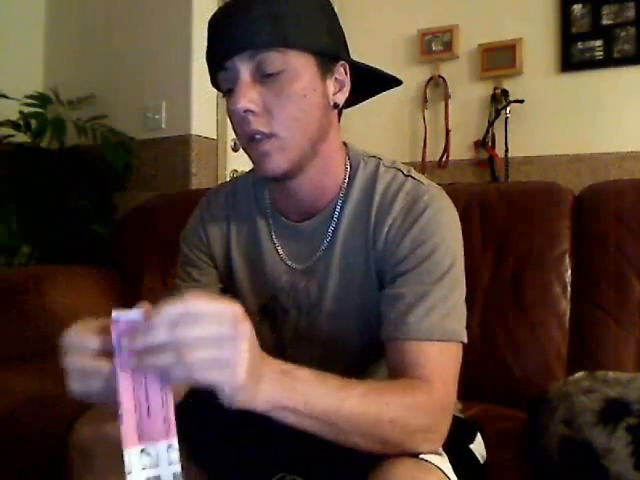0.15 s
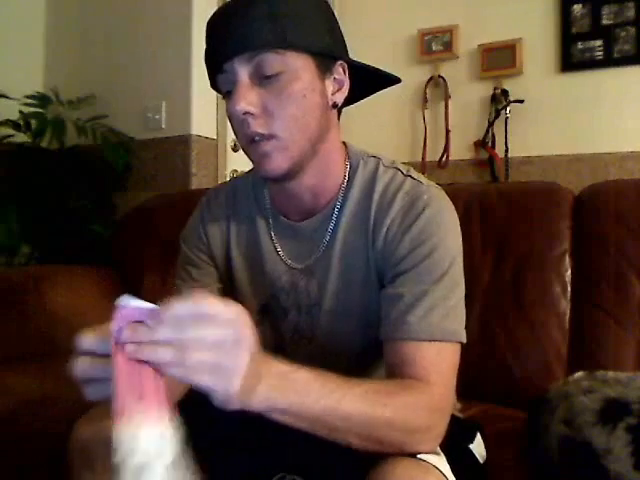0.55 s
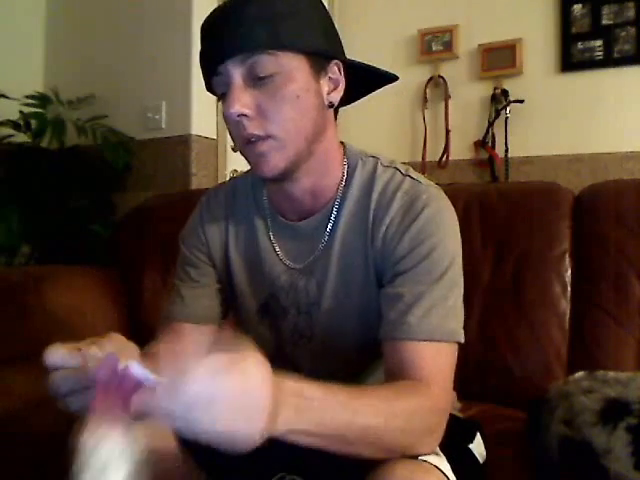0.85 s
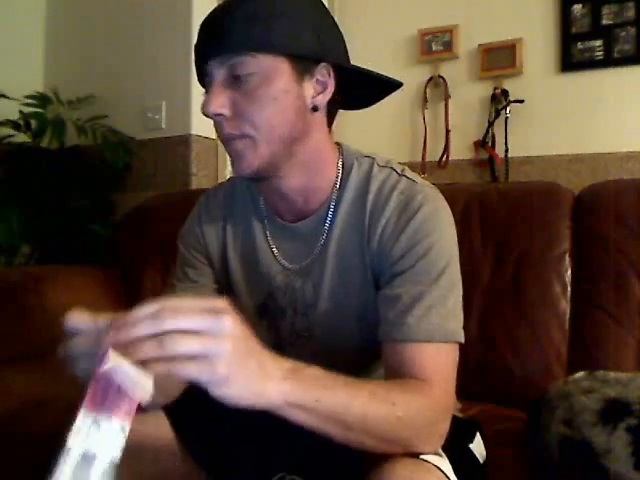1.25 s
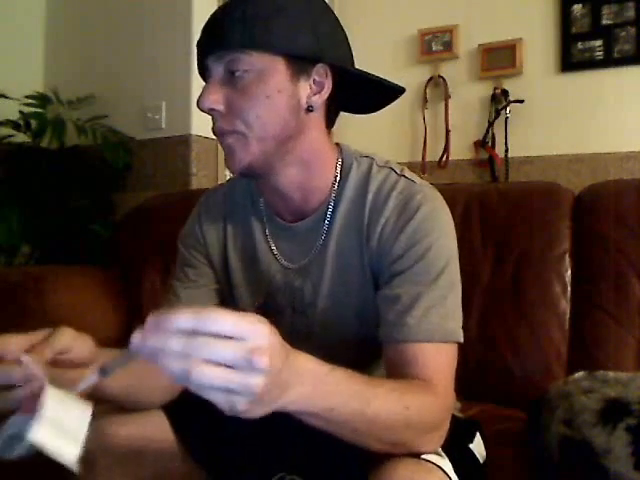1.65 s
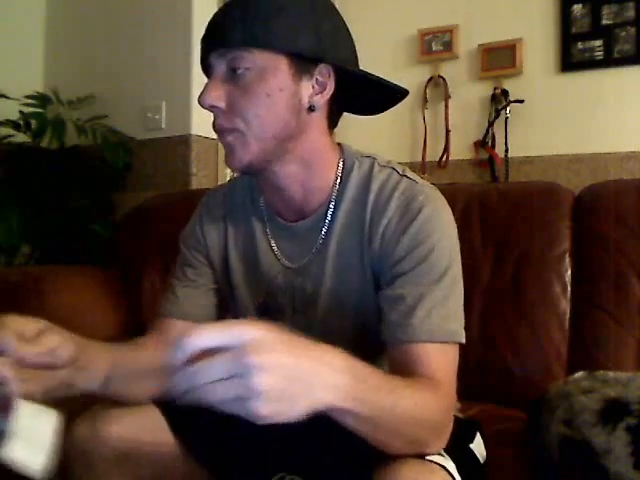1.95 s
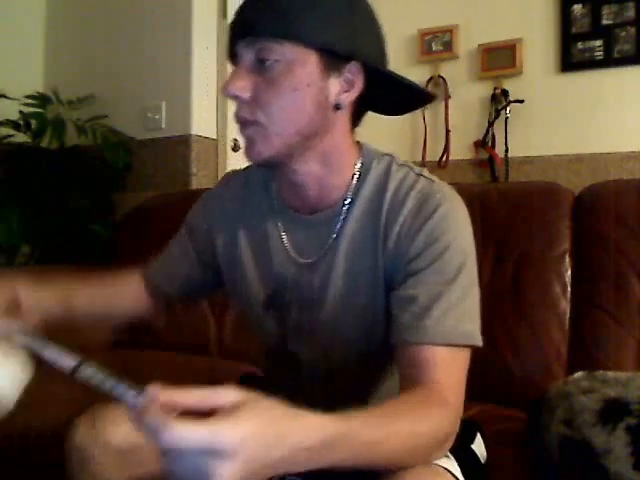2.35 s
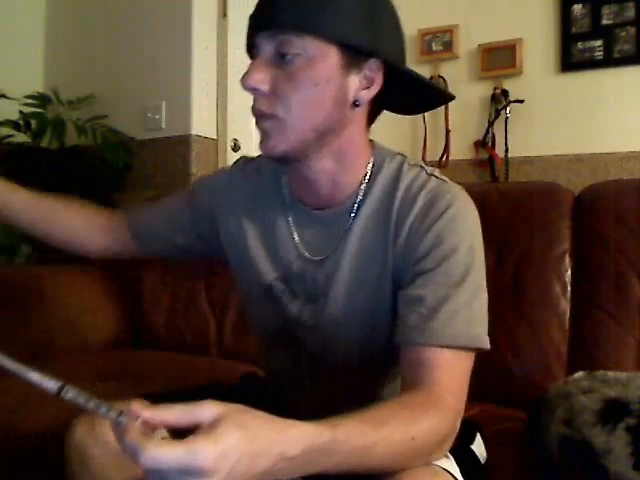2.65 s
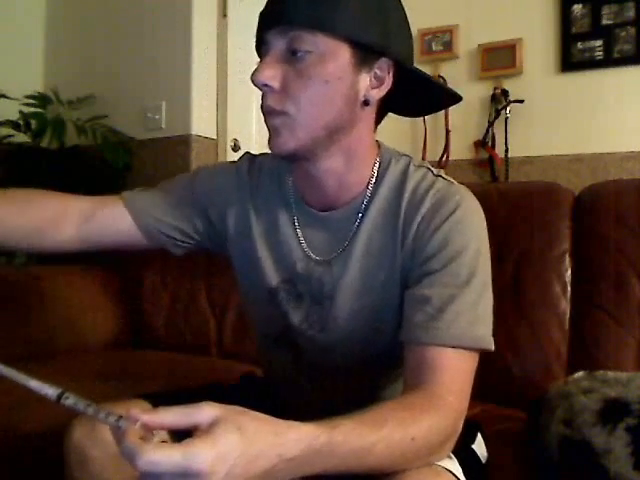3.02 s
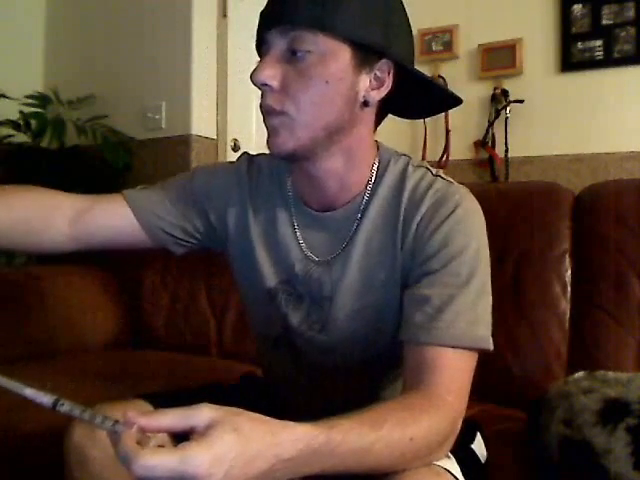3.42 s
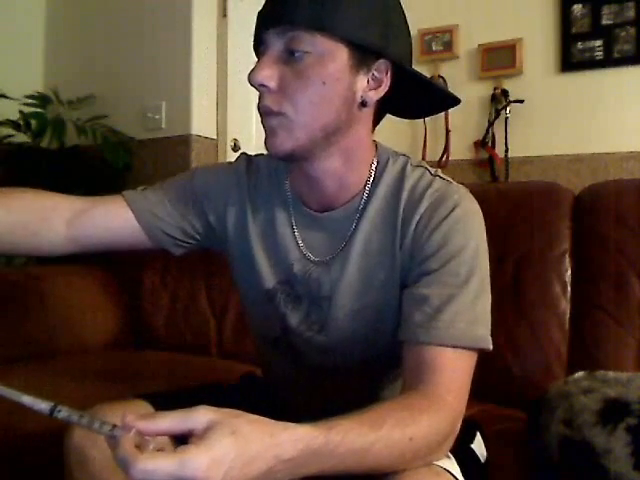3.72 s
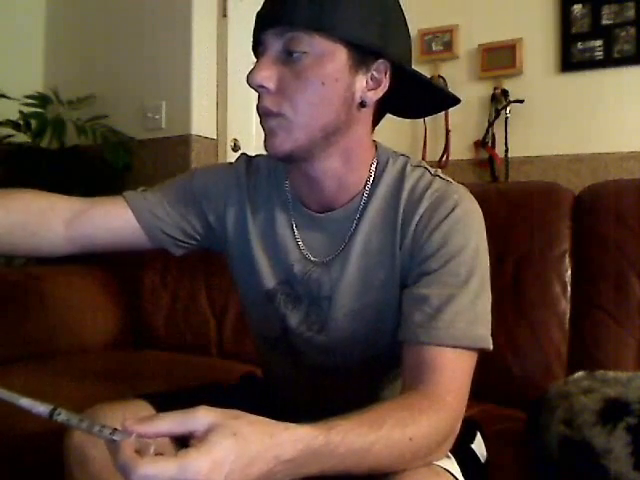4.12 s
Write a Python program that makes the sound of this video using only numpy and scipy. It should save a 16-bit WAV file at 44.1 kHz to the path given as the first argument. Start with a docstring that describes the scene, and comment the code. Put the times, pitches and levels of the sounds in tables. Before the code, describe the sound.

Hands open a small sealed packet indoors: scattered crisp snaps first, a hard tearing burst peaking around 0.6 seconds, brief crackling pulls until about 1.6, and two short clusters of snaps near 1.9 and 2.2. After that only weak plastic ticks and soft rubbing remain over muffled steady background noise. Dry, close, limited treble, with a short small-room reflection.

```python
"""A paper and plastic peel pack is pulled open in a living room, close to a small desk microphone.
First the film buckles in sharp snaps: broad noise cracks, each with the ring of a panel.
Then the seal tears in dense crackle of random grains, the sheet flexes and the syringe slides out with a hiss.
Last, fingers tick and rub faintly on the barrel. Quiet room noise, coloured and steady, lies under it all."""
import sys
import numpy as np
from scipy import signal
from scipy.fft import rfft, irfft
from scipy.io import wavfile
from scipy.ndimage import uniform_filter1d

SR = 44100
rng = np.random.default_rng(int(sys.argv[2]) if len(sys.argv) > 2 else 0)


def store_wav(level_fs):
    """Save 16-bit WAV to argv[1]."""
    pcm = np.round(np.clip(np.atleast_2d(level_fs), -1, 1) * 32767)
    wavfile.write(sys.argv[1], SR, pcm.T.astype(np.int16))


N = 188375
T = np.arange(N) / SR  # seconds

# Source levels below are set ahead of the room and the microphone.
# Steady background of the room. Each row: frequency [Hz], relative level [dB].
ROOM_COLOUR = [(15, -62), (25, -37.5), (48, -19), (197, -9.5), (291, -9), (331, -6), (513, -11.5),
               (555, -11.5), (682, -12), (1060, -19), (1340, -19), (4270, -33), (5970, -32.5), (12000, -39),
               (15600, -74.5), (22000, -120)]
# Paper and fingers sliding on plastic.
# Each row: moment of greatest speed [s], length [s], level [dB], tilt [dB per octave].
SLIDES = [(.005, 0.031, -58.5, -7), (0.832, 0.053, -46, 3), (.92, .17, -39.5, -2.5), (1.038, 0.16, -59, 5),
          (1.382, 0.11, -51.5, 0), (1.817, 0.3, -63.5, -9.5), (1.998, 0.33, -66.5, -8),
          (2.151, .05, -51.5, -7.5), (2.991, 0.093, -71.5, -4.5), (3.193, 0.092, -70.5, -15),
          (3.312, 0.081, -50, 0.5), (3.527, .15, -63.5, 0.5), (3.782, 0.083, -65, 3.5),
          (3.91, 0.22, -66.5, 1.5), (4.255, 0.11, -75.5, 7)]
# Colour of the sliding hiss. Each row: frequency [Hz], relative level [dB].
FRICTION_COLOUR = [(300, -38.5), (1600, -29.5), (2600, -11.5), (4500, -9.5), (7000, -6.5), (9500, 0.5),
                   (12000, -0.5)]
# Dull flaps of the whole pack and soft bumps of the hands.
# Each row: start [s], level over 1 ms [dB], swing frequency [Hz].
FLAPS = [(0.187, -52, 320), (.591, -38.5, 329), (0.671, -36, 290), (0.797, -44.5, 279), (1.16, -51.5, 171),
         (1.57, -49, 130), (1.88, -45, 256), (3.32, -51.5, 264)]
# Colour of creasing and tearing film. Each row: frequency [Hz], relative level [dB].
CRACKLE_COLOUR = [(150, -31), (450, -13.5), (1000, -4), (1250, -1), (1650, -6), (2450, 0.5), (3700, 0),
                  (5900, 2), (7900, -2), (9300, -1), (12000, -2.5)]
# Colour of the flexing sheet. Each row: frequency [Hz], relative level [dB].
FLEX_COLOUR = [(25, -21.5), (60, -20), (110, -17), (170, -4), (250, 1), (400, 1.5), (550, 9.5), (900, -2.5),
               (2000, -30.5), (6000, -59)]
# Pulls that tear the seal.
# Each row: start [s], letting go [s], crackle level [dB], tilt [dB per octave], sheet flexing level [dB].
PULLS = [(0.555, 0.595, -28, -1.5, -43.5), (0.653, 0.798, -43, 0, -52.5), (1.12, 1.128, -29.5, -2, -43),
         (1.434, 1.494, -33, -1.5, -48), (1.516, 1.576, -32, -1.5, -49.5)]
# Colour of one crack. Each row: frequency [Hz], relative level [dB].
CRACK_COLOUR = [(30, -31), (130, -29), (300, -16), (700, -5.5), (1200, -0.5), (6200, 3.5), (7900, -2),
                (9300, -2), (12000, -1)]
# Facets of film and plastic that snap. Each row: moment [s], crack level over 1 ms [dB],
# crack tilt [dB per octave], panel resonance [Hz], ring level over 1 ms [dB].
SNAPS = [(0.0338, -37, 4.5, 1290, -46), (0.0476, -28.5, -1.5, 1240, -24), (.0793, -28, 2, 1260, -37.5),
         (0.0951, -36.5, -1.5, 2670, -41.5), (0.1776, -38, 0, 6840, -43), (0.2073, -48, 35, 8900, -44),
         (0.295, -42, -5, 4500, -32), (0.3159, -34, 8, 1542, -38), (0.3271, -43.5, -10, 1213, -39.5),
         (.355, -39.5, -7, 945, -33.5), (.4055, -34, 0.5, 4380, -26.5), (0.426, -33, 0.5, 2460, -32.5),
         (0.4426, -28.5, 0.5, 3260, -27), (0.4504, -43, 0, 6400, -29), (.5035, -38, 5.5, 5900, -42.5),
         (0.5619, -19, -.5, 2200, -24), (.575, -27, -12, 5180, -22.5), (0.5853, -21, 0.5, 1170, -27.5),
         (0.5914, -6, 3, 11310, -6.5), (0.634, -29.5, 2.5, 1199, -30.5), (.652, -21.5, 3, 2590, -38.5),
         (0.6729, -10.5, 4, 6430, -12.5), (0.6882, -40, 1, 2420, -26.5), (0.703, -43, -16, 2378, -32.5),
         (.7456, -29, -2, 2270, -28.5), (0.7894, -34.5, 4, 854, -33), (0.7955, -36, -14, 8650, -31.5),
         (0.8332, -50, 6, 7730, -38), (0.8491, -29.5, 14.5, 5860, -27), (1.0587, -21, 1.5, 3120, -26.5),
         (1.072, -33, -8.5, 2330, -34), (1.097, -39.5, -3, 4830, -37), (1.139, -16.5, -3, 2560, -21),
         (1.1631, -46, -1.5, 2730, -34), (1.3273, -30, 7.5, 6520, -33), (1.3989, -28, 2, 10450, -25),
         (1.409, -26.5, 1, 5700, -31.5), (1.4312, -26.5, 0, 5980, -28), (1.4488, -21, -1, 1170, -30),
         (1.4631, -19.5, 8, 2580, -25), (1.542, -18, -3, 2420, -20), (1.5612, -27, 3, 7573, -27),
         (1.5937, -21.5, 22.5, 2790, -27), (1.8006, -60.5, -0.5, 9680, -50.5), (1.872, -25.5, 8, 4010, -35),
         (1.8846, -20.5, 4, 2860, -24.5), (2.011, -69, 19, 11400, -44), (2.0952, -56.5, 3, 2400, -56.5),
         (2.1568, -35.5, 5.5, 6030, -34), (2.1738, -17.5, 12, 6700, -25.5), (2.1953, -23.5, 6, 5200, -30),
         (2.2511, -49, 33, 1826, -32.5), (2.286, -41, 11, 4940, -53), (2.2949, -38, 3, 2310, -45),
         (2.3218, -32, 9.5, 7660, -35), (2.4954, -31.5, 10.5, 6000, -37.5),
         (2.52, -64.5, 11.5, 6850, -42.5), (2.7019, -57.5, -2.5, 3754, -55.5),
         (3.0447, -53, 14, 9110, -47.5), (3.1638, -50.5, 0.5, 5390, -45.5), (3.3739, -49, 1, 5850, -44),
         (3.3843, -43.5, 0, 8970, -42.5)]
# Resonances of the microphone housing.
# Each row: frequency [Hz], width [Hz], level added to the direct sound [dB].
HOUSING = [(1295, 50, -5), (2450, 860, -10.5), (5870, 1400, -12), (9060, 880, -6.5), (10470, 230, -11),
           (11086, 89, -12)]

ROOM_NOISE_DB = -68
TOP_HZ = 12050  # upper limit of the microphone
# the film settles after each snap: crackle dB after a 0 dB snap, dB gained per dB of snap, duration,
# dB of tilt per octave of panel pitch, share of the crack's own tilt that is kept
SETTLE_DB, SETTLE_GROWTH, SETTLE_S, SETTLE_TILT_DB, SETTLE_TILT_SHARE = -29, 0.76, 0.053, 0.5, .3
# the creases keep the panel ringing: dB against their crackle
SETTLE_RING_DB = -7
# the film creaks just before it gives: for how long, and its peak against the crackle that follows
STRAIN_S, STRAIN_DB = 0.012, -5
# the grip tightens before each pull: for how long, and how far below the pull it crackles
GRIP_S, GRIP_DB = 0.014, -15.5
# every pull builds up quickly and eases off along a curve (exponent)
PULL_ATTACK_S, PULL_RELEASE_S, RELEASE_CURVE = 0.013, .1, 2.6
# facets that pop during a pull: rate, level against the crackle and its spread, pitch and its spread
POPS_PER_S, POP_DB, POP_SPREAD_DB, POP_HZ, POP_SPREAD_OCTAVES = 80, -1.5, 1, 2842, 0.92
# a facet starts to give this long before it snaps
LEAD_S = .002
# a typical facet, how hard it snaps and how fast its crack dies
FACET_HZ, FACET_DB, CRACK_S = 4000, -30, .0011
# higher facets and harder snaps are quicker: exponents of pitch and of strength
QUICKER_WITH_PITCH, QUICKER_WITH_FORCE = .4, .2
# sharpness (centre over width) of each of the two resonators that make up a panel
PANEL_Q = 4.2


def undb(db):
    """Decibels to gain."""
    return 10 ** (np.asarray(db) / 20)


def unit(x):
    """Scale to rms 1."""
    return x / np.sqrt(np.mean(x ** 2))


def colour(x, points, tilt_db=0, size=2048):
    """Causal minimum-phase filter through (Hz, dB) points, tilted by so many dB an octave."""
    octave = np.log2(np.maximum(np.fft.rfftfreq(size, 1 / SR), 10))
    top = np.log2(TOP_HZ)
    hz, db = np.transpose(points)
    shape = np.interp(octave, np.log2(hz), db)
    shape += tilt_db * np.clip(octave, np.log2(600), top)
    shape -= 60 * np.maximum(octave - top, 0)
    # folding the cepstrum forward in time makes the filter causal
    cepstrum = irfft(np.log(undb(shape - shape.max())))
    cepstrum[1:size // 2] *= 2
    cepstrum[size // 2 + 1:] = 0
    response = irfft(np.exp(rfft(cepstrum)))
    return signal.fftconvolve(x, response)[:len(x)]


def resonate(x, hz, width_hz):
    """One resonance, gain 1 at its centre."""
    b, a = signal.iirpeak(min(hz, .45 * SR), hz / width_hz, fs=SR)
    return signal.lfilter(b, a, x)


def ring_panel(x, hz):
    """A panel driven by x: two equal resonators in a row, scaled to rms 1."""
    once = resonate(x, hz, hz / PANEL_Q)
    return unit(resonate(once, hz, hz / PANEL_Q))


def add(track, start, x):
    """Mix x into the track from a given time."""
    i = int(start * SR) + np.arange(len(x))
    inside = (i >= 0) & (i < N)
    track[i[inside]] += x[inside]


def grains(rate, spread_db):
    """Random tiny clicks, most weak and a few strong."""
    size = undb(spread_db * np.minimum(rng.exponential(size=N), 4))
    return (rng.random(N) < rate / SR) * size * rng.standard_normal(N)


def flip(decay):
    """A burst of tiny slips under an envelope, with an even spectrum."""
    spectrum = rfft(decay * rng.choice([-1, 1], len(decay)))
    power = uniform_filter1d(np.abs(spectrum) ** 2, size=50)
    return irfft(spectrum / np.sqrt(power))


def crackle(rate, spread_db, catch_db=2.0, catch_hz=170, count=6, size=400):
    """Several patches of film crackle, each with its own brief shiver; they catch and let go every few ms."""
    shiver = np.exp(-T[:size] / .0008)
    patches = sum(signal.fftconvolve(grains(rate / count, spread_db), flip(shiver))[:N] for _ in range(count))
    catch = np.interp(T * catch_hz, np.arange(N), rng.standard_normal(N))
    return patches * undb(catch_db * catch)


def room_noise():
    """The steady background of the room: white noise through the room's colour."""
    return undb(ROOM_NOISE_DB) * unit(colour(rng.standard_normal(N), ROOM_COLOUR))


def room(x, t60_s=0.2, treble_t60_s=0.23, wet_db=-13.5, first_s=0.00043, build_s=0.0015, tilt_db=-0.8, size=16384):
    """Scattered reflections from walls and furniture; above 6.5 kHz they die away slightly more slowly."""
    t = T[:size]
    onset = 1 - np.exp(-np.maximum(t - first_s, 0) / build_s)
    echoes = colour(grains(6500, 3.7)[:size], [(100, -6.5), (1000, -0.5), (5500, 2.8), (12000, -4.0)], tilt_db)
    lows = signal.sosfiltfilt(signal.butter(2, 6500, fs=SR, output="sos"), echoes)
    treble = echoes - lows
    tail = lows * np.exp(-np.log(1000) * t / t60_s) + treble * np.exp(-np.log(1000) * t / treble_t60_s)
    # the factor 2 leaves the tail's energy 3 dB below wet_db
    response = unit(onset * tail) / np.sqrt(2 * size)
    return x + undb(wet_db) * signal.fftconvolve(x, response)[:N]


def slides(rate=7000, spread_db=4.4, steepness=1.36):
    """Fine surface roughness catches and slips: a bright, grainy hiss that grows quickly with speed."""
    out, slips = np.zeros(N), grains(rate, spread_db)
    for middle, length_s, db, tilt_db in SLIDES:
        start = middle - length_s / 2
        speed = np.bartlett(int(length_s * SR))
        part = np.roll(slips, -int(start * SR))[:len(speed)]
        hiss = unit(colour(part, FRICTION_COLOUR, tilt_db))
        add(out, start, undb(db) * speed ** steepness * hiss)
    return out


def flaps(swing_s=.009, push_s=.0015, push_db=25, size=4096):
    """The sheet or a hand moves air: a few damped swings, and a push that grows with the square of the force."""
    out, t = np.zeros(N), T[:size]
    one_ms = np.sqrt(SR / 1000 / size)  # rms 1 over the buffer becomes the energy of 1 ms at rms 1
    push = unit(t * np.exp(-t / push_s))
    for start, db, hz in FLAPS:
        swing = unit(np.sin(2 * np.pi * hz * t) * np.exp(-t / swing_s))
        add(out, start, one_ms * (undb(db) * swing + undb(push_db) * undb(db) ** 2 * push))
    return out


def settling():
    """Creases strain before each snap and creep after it: louder around a strong one, darker around a large facet."""
    out, creases = np.zeros(N), crackle(rate=2100, spread_db=1.5)
    strain = np.linspace(0, undb(STRAIN_DB), int(STRAIN_S * SR))
    shape = np.r_[strain, np.linspace(1, 0, int(SETTLE_S * SR))]
    for at, crack_db, tilt_db, hz, ring_db in SNAPS:
        start = at - STRAIN_S
        strength = np.hypot(undb(crack_db), undb(ring_db)) ** SETTLE_GROWTH
        slips = np.roll(creases, -int(start * SR))[:len(shape)]
        creep_tilt_db = SETTLE_TILT_DB * np.log2(hz / FACET_HZ) + SETTLE_TILT_SHARE * tilt_db
        creep = unit(colour(slips, CRACKLE_COLOUR, creep_tilt_db))
        panel = ring_panel(slips, hz)
        add(out, start, undb(SETTLE_DB) * strength * shape * (creep + undb(SETTLE_RING_DB) * panel))
    return out


def effort(start, let_go):
    """One pull: the grip tightens, the force rises, holds and dies away. Gives the times and the force."""
    t = start - GRIP_S + T[:int((GRIP_S + let_go - start + PULL_RELEASE_S) * SR)]
    rise = np.interp(t, [start, start + PULL_ATTACK_S], [undb(GRIP_DB), 1])
    release = np.interp(t, [let_go, let_go + PULL_RELEASE_S], [1, 0]) ** RELEASE_CURVE
    return t, rise * release


def pulls():
    """Fibres of the seal give way in small runs; the whole sheet flexes beneath the crackle."""
    out = np.zeros(N)
    fibres = crackle(rate=2200, spread_db=3.0)
    flexing = grains(rate=2000, spread_db=4.5)
    for start, let_go, db, tilt_db, flex_db in PULLS:
        t, force = effort(start, let_go)
        part = int(t[0] * SR) + np.arange(len(t))
        add(out, t[0], force * undb(db) * unit(colour(fibres[part], CRACKLE_COLOUR, tilt_db)))
        add(out, t[0], force * undb(flex_db) * unit(colour(flexing[part], FLEX_COLOUR)))
    return out


def snap(crack_db, tilt_db, hz, ring_db, rise_s=0.00034, shiver_s=.0035, shiver_db=-20, rough_db=-4, size=1536):
    """A facet of film flips over: a broad crack, a short shiver of the sheet, and the ring of the panel."""
    one_ms = np.sqrt(SR / 1000 / size)  # as in flaps()
    t = T[:size] - LEAD_S
    slowness = (FACET_HZ / hz) ** QUICKER_WITH_PITCH * undb(FACET_DB - crack_db) ** QUICKER_WITH_FORCE
    crack_s = CRACK_S * slowness
    fall = np.exp(-np.abs(t) / crack_s) + undb(shiver_db) * np.exp(-t / shiver_s)
    envelope = np.where(t < 0, np.exp(-np.abs(t) / rise_s), fall)
    crack = unit(colour(flip(envelope), CRACK_COLOUR, tilt_db))
    push = signal.unit_impulse(size, int(LEAD_S * SR)) + undb(rough_db) * flip(envelope)
    return one_ms * (undb(crack_db) * crack + undb(ring_db) * ring_panel(push, hz))


def pops(ring_db=-5.0, count=40):
    """Small facets buckle at uneven intervals while the seal is pulled, each with its own pitch."""
    out = np.zeros(N)
    for start, let_go, db, tilt_db, _ in PULLS:
        t, force = effort(start, let_go)
        times = start + (np.arange(count) + rng.random(count)) / POPS_PER_S
        draws = np.clip(rng.standard_normal((count, 2)), -2, 2)
        for at, (loud, high) in zip(times, draws):
            if at < t[-1]:
                pop_db = db + POP_DB + POP_SPREAD_DB * loud
                hz = min(POP_HZ * 2 ** (POP_SPREAD_OCTAVES * high), TOP_HZ)
                add(out, at, np.interp(at, t, force) * snap(pop_db, tilt_db, hz, pop_db + ring_db))
    return out


def snaps():
    """The distinct snaps of film and plastic, each a facet that gives at its listed moment."""
    out = np.zeros(N)
    for at, crack_db, tilt_db, hz, ring_db in SNAPS:
        add(out, at - LEAD_S, snap(crack_db, tilt_db, hz, ring_db))
    return out


def scene():
    """The pack and the hands in the room, over its steady background."""
    handling = slides() + flaps() + settling() + pulls() + pops() + snaps()
    return (room_noise() + room(handling))[None]


def record(dry, gain_db=-0.77):
    """The microphone housing rings a little, peaks beyond full scale are clipped, and the top is cut."""
    heard = dry + sum(undb(db) * resonate(dry, hz, width_hz) for hz, width_hz, db in HOUSING)
    heard = np.clip(undb(gain_db) * heard, -1, 1)
    return signal.sosfilt(signal.ellip(10, .2, 70, TOP_HZ, fs=SR, output="sos"), heard)


dry = scene()
out = record(dry)
store_wav(out)
```